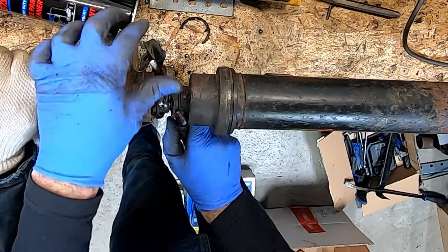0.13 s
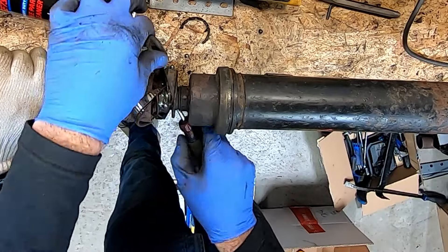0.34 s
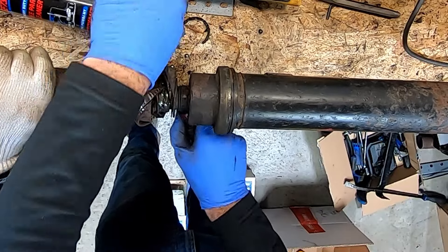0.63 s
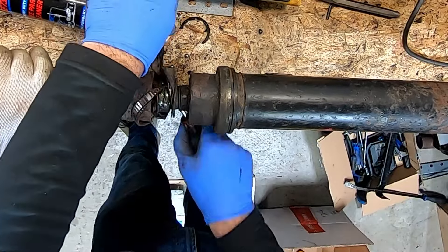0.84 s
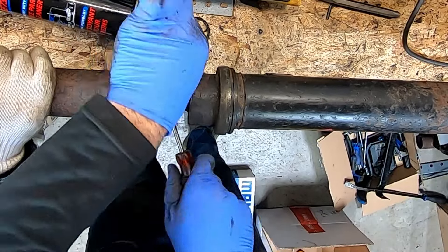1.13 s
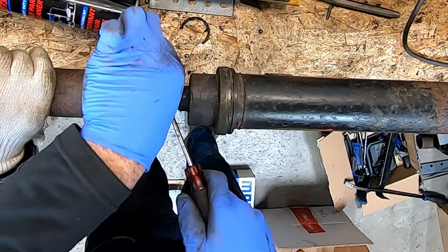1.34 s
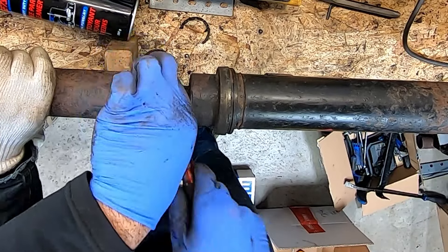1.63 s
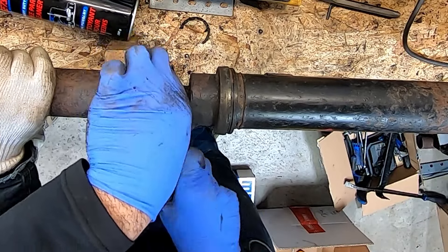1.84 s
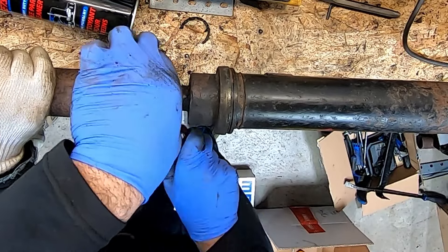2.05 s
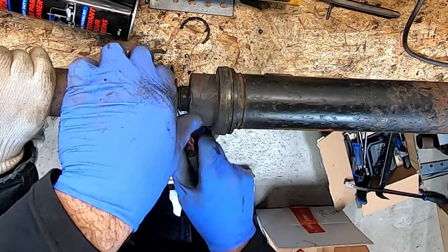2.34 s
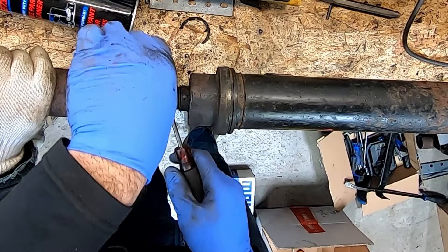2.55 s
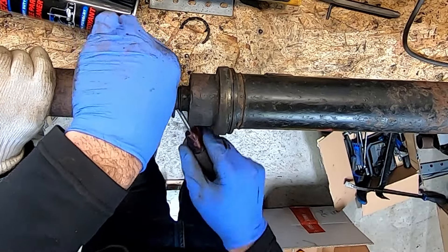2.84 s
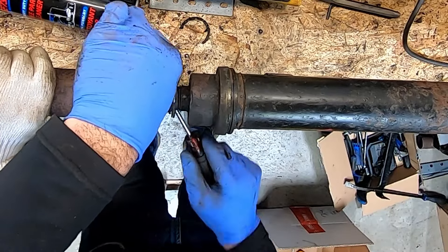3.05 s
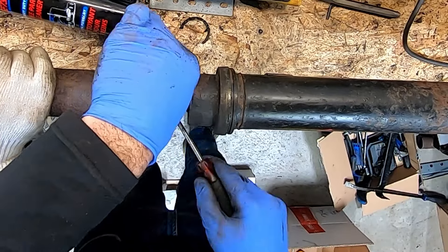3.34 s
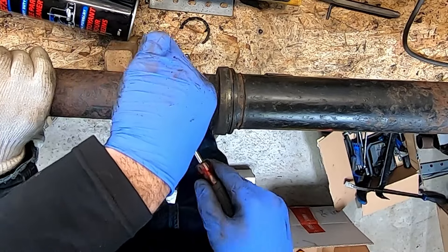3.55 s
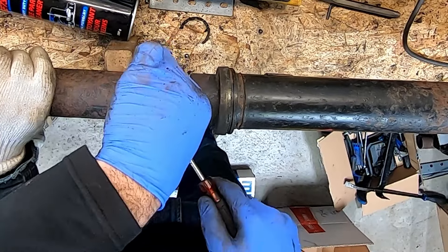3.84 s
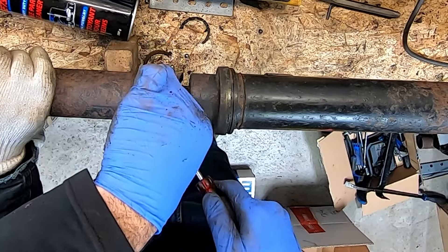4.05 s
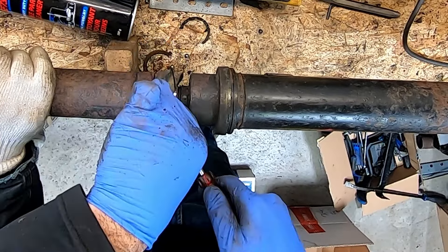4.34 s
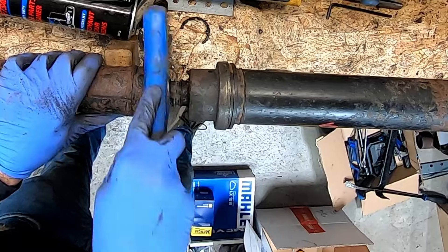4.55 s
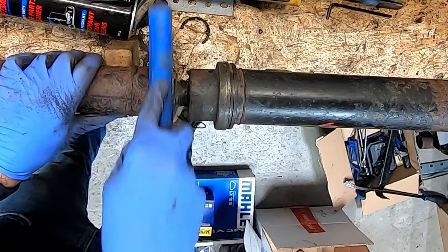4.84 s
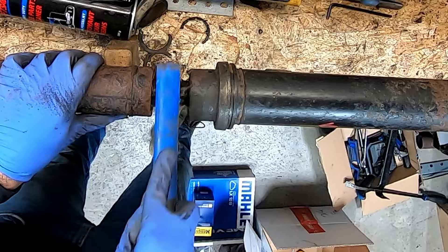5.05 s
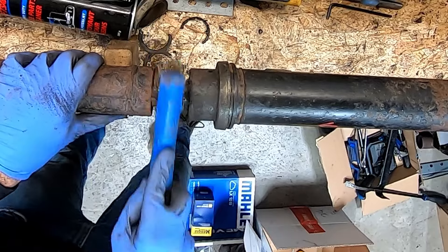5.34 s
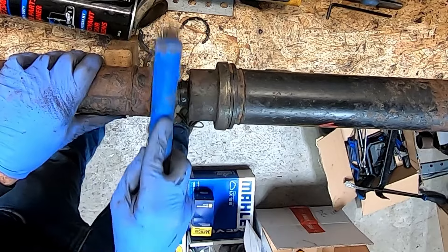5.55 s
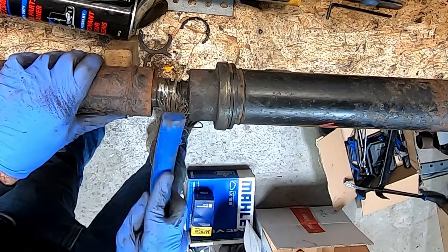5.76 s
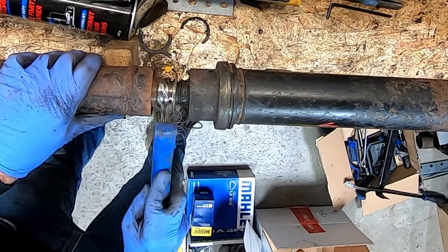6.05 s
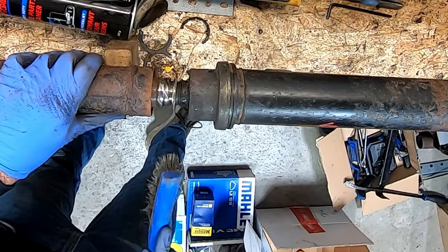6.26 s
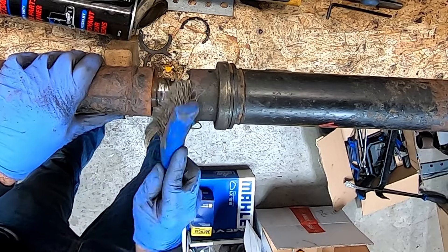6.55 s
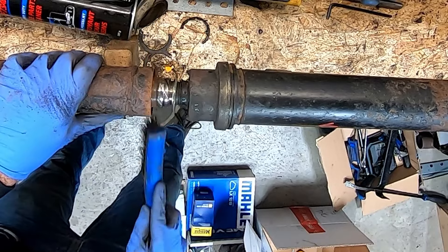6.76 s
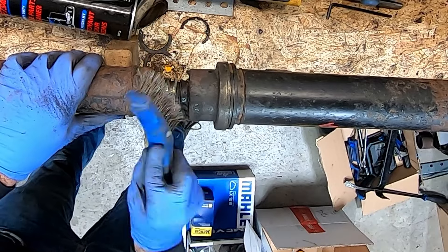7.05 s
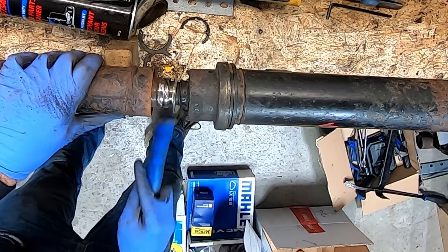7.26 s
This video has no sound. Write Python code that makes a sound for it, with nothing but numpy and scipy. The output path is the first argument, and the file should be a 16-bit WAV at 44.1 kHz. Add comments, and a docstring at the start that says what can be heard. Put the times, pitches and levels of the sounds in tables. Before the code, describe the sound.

Soft scrapes, glove rustles and scattered metal clicks come from a rusty steel shaft being handled on a bench while a pick works at its clamp. Then a wire brush scrubs the shaft in a louder run of fast, hissing strokes, ending in a sharp clank. Two separate strokes and several more knocks follow. The walls of a small workshop add a short reverberation over faint room noise.

```python
"""A small workshop: gloved hands work a pick and a clamp on a rusty steel shaft lying on a bench.
The shaft grinds on its rests, gloves and rust rustle, steel knocks and ticks, the flicked clamp rings
and a fingertip squeaks on the collar. Then a wire brush scrubs the shaft: bristle tips snap over the
rust as dense clicks that ring the steel, the bench shakes and the brush back knocks on the shaft.
The walls reflect it all over quiet room noise; the two channels are nearly alike."""
import sys
import numpy as np
from scipy import signal
from scipy.fft import rfft, irfft
from scipy.io import wavfile
from scipy.ndimage import uniform_filter1d

SR = 44100
rng = np.random.default_rng(int(sys.argv[2]) if len(sys.argv) > 2 else 0)


def master(y):
    """Save y as 16-bit WAV."""
    cut = np.clip(np.atleast_2d(y).T, -1, 1)
    pcm = np.round(cut * 32767)  # scale
    wavfile.write(sys.argv[1], SR, pcm.astype(np.int16))


N = 326781
T = np.arange(N) / SR


def undb(db):
    """Decibels to gain."""
    return 10 ** (np.asarray(db) / 20)


def unit_rms(x):
    """Scale to rms 1."""
    return x / np.sqrt(np.mean(x ** 2))


def unit_peak(x):
    """Scale to peak 1."""
    return x / np.abs(x).max()


def ramp(x):
    """Smooth step over x = 0..1."""
    return np.sin(np.pi / 2 * np.clip(x, 0, 1)) ** 2


def colour(x, points, size=4096):
    """Minimum-phase filter through (freq_hz, gain_db) points; white noise keeps its rms."""
    hz, db = np.transpose(points)
    curve_db = np.interp(np.log(np.arange(size // 2 + 1) * SR / size + 1), np.log(hz), db)
    cepstrum = irfft(curve_db * np.log(10) / 20)
    cepstrum[1:size // 2] *= 2
    cepstrum[size // 2 + 1:] = 0
    impulse = unit_rms(irfft(np.exp(rfft(cepstrum)))) / np.sqrt(size)
    return signal.oaconvolve(x, impulse)[:len(x)]


def bandpass(x, hz, width_hz):
    """One resonance, unity gain at its peak."""
    return signal.lfilter(*signal.iirpeak(min(hz, 16000), hz / width_hz, SR), x)


def resonate(x, modes):
    """Sum of (freq_hz, width_hz, gain_db) resonances, neighbours in opposite phase."""
    return sum((-1) ** k * undb(db) * bandpass(x, hz, width) for k, (hz, width, db) in enumerate(modes))


def walk(rate_hz):
    """Slewed random levels, spread near 1."""
    step = int(SR / rate_hz)
    return 1.5 * uniform_filter1d(np.repeat(rng.standard_normal(N // step + 1), step), step)[:N]


def clicks(share, spread_db, patchy_db, rate_hz):
    """Random snaps on a share of the samples, a few much harder, in uneven patches."""
    snaps = (rng.random(N) < share) * rng.standard_normal(N)
    return unit_rms(snaps * undb(spread_db * rng.exponential(1, N) + patchy_db * walk(rate_hz)))


def add(out, start_s, x):
    """Mix x into out at start_s."""
    i = int(start_s * SR)
    out[i:i + len(x)] += x[:N - i]


# freq_hz, density_db
ROOM_NOISE_SPECTRUM = [(12, -41.5), (20, 8.5), (63, -3.5), (240, -9), (308, -6), (554, -13), (674, -15.5),
                       (866, -15), (1150, -20.5), (2060, -26), (2430, -29.5), (11000, -32), (15800, -33)]


def room_noise(level_db=-67.5):
    """Quiet, low room noise that wavers a little."""
    return undb(level_db + 2.1 * walk(6.9)) * unit_rms(colour(rng.standard_normal(N), ROOM_NOISE_SPECTRUM))


# freq_hz, width_hz, gain_db
GRIND_MODES = [(434.6, 70, 9), (815, 122, 5.5), (1082, 102, -1.5), (1348, 41, 0.5), (1546, 300, -9.5),
               (1847, 710, -19), (860, 433, -14.5)]


def shaft_grind():
    """The shaft scrapes on its rests; the grip damps each mode in turn."""
    scrape = clicks(0.079, spread_db=2, patchy_db=2.5, rate_hz=40)
    return unit_rms(sum(resonate(scrape * undb(2.47 * walk(12)), [mode]) for mode in GRIND_MODES))


# freq_hz, density_db
RUSTLE_SPECTRUM = [(1180, -8.5), (2000, 7), (2590, -24), (3160, -3), (3960, -10.5), (5790, -4),
                   (9650, -11.5), (11800, -8.5), (15800, -23)]


def rust_rustle(tilt_db_per_oct):
    """Gloves rub rust; flakes of every size ring briefly, so each band comes and goes alone."""
    grit = clicks(0.25, spread_db=2, patchy_db=3, rate_hz=60)
    bands_hz = 2400 * 2 ** np.arange(0, 2.75, .25)
    shares = np.array([undb(3.5 * walk(22) + tilt_db_per_oct * np.log2(hz / 6000)) for hz in bands_hz])
    shares /= np.sqrt(np.mean(shares ** 2, axis=0))
    flakes = sum(bandpass(grit * share, hz, hz / 7) for hz, share in zip(bands_hz, shares))
    return unit_rms(colour(flakes, RUSTLE_SPECTRUM))


# freq_hz, gain_db, t60_s
CLAMP_MODES = [(3310, -12, 0.062), (4226, -5, 0.096), (5350, -11, 0.13), (5970, -12, 0.076),
               (6476, -9, 0.076), (7750, -17, 0.06), (8700, -13, 0.11), (9660, -15, 0.1), (10000, -21, .1),
               (10860, -12.5, 0.051), (12400, -14, .09)]


def clamp_chinks():
    """The pick brushes the clamp; sparse touches ring its modes."""
    touches = clicks(.002, spread_db=2, patchy_db=3, rate_hz=25)
    out = np.zeros(N)
    for hz, db, t60_s in CLAMP_MODES:
        width_hz = 6 / t60_s
        drive = touches * undb(4.5 * walk(25) - 10 * np.log10(width_hz))
        out += undb(db) * bandpass(drive, hz, width_hz)
    return unit_rms(out)


# freq_hz, width_hz, gain_db
BENCH_MODES = [(107.8, 27.7, -1.5), (54, 37, -7.5)]


def bench_shake():
    """The bench top rumbles under uneven pushes."""
    return unit_rms(resonate(clicks(0.012, spread_db=3, patchy_db=0, rate_hz=31), BENCH_MODES))


# start_s, rise_s, hold_s, grind_db, rustle_db, rustle_tilt_db_per_oct, shake_db
HAND_MOVES = [(0.0, 0.0024, 0.12, -70.5, -68, 0.5, -77), (0.19, 0.0094, .02, -57, -65, -17, -80),
              (0.25, .02, 0.14, -65.5, -72.5, -1, -79), (0.43, 0.029, 0.029, -74, -67, 5, -71.5),
              (0.544, 0.011, 0.029, -60.5, -74, 5, -64), (0.636, 0.024, 0.085, -78, -79, 2, -74),
              (0.786, 0.0088, 0.069, -68, -67, 19, -77), (0.885, 0.1, 0.028, -51, -58.5, -1.5, -63),
              (1.052, 0.018, 0.1, -59.5, -69.5, -1, -73), (1.226, 0.059, .17, -58.5, -69, 3.5, -68.5),
              (1.486, 0.033, 0.091, -66.5, -77, 11, -67), (1.626, 0.0059, 0.19, -48, -71, 15, -55.5),
              (1.85, .02, 0.065, -61, -71, -2, -61), (2.044, 0.018, 0.019, -60.5, -77, 6, -66),
              (2.095, 0.046, 0.015, -59.5, -67, -19, -56), (2.267, .03, 0.055, -63, -73, -5, -66),
              (2.38, 0.023, 0.066, -67, -71, -2, -70.5), (2.494, 0.018, 0.032, -62, -66.5, 2, -69),
              (2.604, 0.095, 0.063, -54.5, -68, 9, -60), (2.837, 0.011, 0.018, -56, -62.5, -5, -57.5),
              (2.916, .02, 0.036, -60, -68, -2, -68), (3.041, 0.019, 0.033, -60.5, -68.5, 3, -66),
              (3.165, .005, 0.14, -63, -85, -9, -72), (3.305, 0.014, 0.091, -55.5, -66.5, 6, -59),
              (3.44, .02, 0.054, -83, -95, 0, -66), (3.608, 0.023, 0.024, -58, -54.5, -5.5, -62.5),
              (3.816, 0.0085, 0.016, -68.5, -81, -3, -67.5), (3.892, 0.026, 0.1, -67.5, -87, 3, -71),
              (4.053, 0.032, 0.099, -66, -75.5, 1, -78), (4.223, 0.032, 0.055, -71.5, -81, 0, -67),
              (4.43, 0.01, 0.014, -56.5, -66, -6, -56), (7.323, .01, 0.055, -59.5, -64.5, -8, -68)]


def hands(release_t60_s=0.19, chink_re_rustle_db=-11):
    """Each move turns the shaft, rustles the rust, brushes the clamp and shakes the bench."""
    start_s, rise_s, hold_s, grind_db, rustle_db, tilts, shake_db = np.transpose(HAND_MOVES)[:, :, None]
    released_s = np.clip(T - start_s - rise_s - hold_s, 0, None)
    effort = ramp((T - start_s) / rise_s) * undb(-60 * released_s / release_t60_s)
    grind_gain, rustle_gain, shake_gain = (np.linalg.norm(effort * undb(db), axis=0)
                                           for db in (grind_db, rustle_db, shake_db))
    loudest_move = np.argmax(effort * undb(rustle_db), axis=0)
    grind = shaft_grind()
    rustle = rust_rustle(tilts[loudest_move, 0]) + undb(chink_re_rustle_db) * clamp_chinks()
    return grind_gain * grind + rustle_gain * rustle + shake_gain * bench_shake()


# freq_hz, width_hz, gain_db
GRIPPED_SHAFT_MODES = [(215, 100, -13), (476, 44, -4.5), (587, 58, -5.5), (708, 45, 2.5), (838, 130, -10),
                       (992, 48, -6), (1230, 65, -5), (1690, 1170, -15), (2160, 180, -10)]
# freq_hz, width_hz, gain_db
FREE_SHAFT_MODES = [(2140, 22, -2), (2885, 14, 0), (2990, 18, 5), (3620, 9, -12), (3561, 11, -3.5),
                    (3870, 9, -6), (4060, 12, -6.5), (4670, 11, -15), (4850, 40, -8), (5910, 26, -5),
                    (6510, 53, -1.5), (6100, 15, -11)]
# start_s, thock_peak_db, brightness_db, thud_re_thock_db, ring_re_thock_db
SHAFT_KNOCKS = [(0.111, -53, -6, -13, -11), (0.182, -34, -12.5, -38, -22), (0.198, -36, 9, -37, -36),
                (0.357, -48, -4.5, -24, -27), (0.554, -51, -34, -25, -20), (0.574, -54, -25, -10, -24),
                (0.796, -51.5, -10, -24, -25), (0.913, -44, -6, -14, -22), (1.331, -44.5, 13, -32, -20),
                (1.401, -44.5, -17, -28, -28), (1.626, -27.5, 9, -33, -25), (1.676, -34.5, -6.5, -19, -25),
                (1.732, -34, -24, -20, -24), (1.793, -38, -25, -22, -35), (2.835, -44, -8.5, -20, -23),
                (2.949, -49, 1, -18, -8), (3.169, -33, -5.5, -35, -33), (4.44, -45, 11, -5, -25),
                (6.166, -12.5, -13, -23, -10), (6.557, -26.5, -6.5, -1, -13.5), (6.606, -42, -0.5, 4, -12),
                (6.647, -35.5, -3.5, -9, -20), (6.717, -35.5, -25, -8, -20), (6.774, -27, -10, -34, -20),
                (7.095, -29, 1, -12, -16), (7.122, -40, -13, -8, -21)]


def shaft_knocks(rattle_s=0.0041, contact_band_hz=(330, 2600)):
    """A blow and its rattle thock in the held shaft, ring its upper modes and thud in the bench."""
    out, t = np.zeros(N), T[:SR // 3]
    contact = signal.butter(2, contact_band_hz, "bandpass", fs=SR)
    for start_s, peak_db, bright_db, thud_db, ring_db in SHAFT_KNOCKS:
        blow = 0.1 * rng.standard_normal(len(t)) * np.exp(-t / rattle_s)
        blow[0] = 1
        modes = [(hz, width, db + (hz > 950) * (bright_db + 9.5)) for hz, width, db in GRIPPED_SHAFT_MODES]
        thock = unit_peak(resonate(signal.lfilter(*contact, blow), modes))
        ring = unit_peak(resonate(blow, FREE_SHAFT_MODES))
        thud = unit_peak(resonate(1. * (t < .003), BENCH_MODES))
        add(out, start_s, undb(peak_db) * (thock + undb(ring_db) * ring + undb(thud_db) * thud))
    return out


# start_s, peak_db, centre_hz, t60_s
STEEL_TICKS = [(0.18, -40, 3300, .04), (0.2828, -40, 7500, .03), (0.413, -60, 5070, .035),
               (0.801, -45, 4930, .025), (0.954, -49, 3260, .05), (1.094, -46.5, 4820, .044),
               (1.3324, -47, 5740, .035), (1.6275, -30.5, 4440, .042), (1.696, -45, 4680, .04),
               (1.8465, -55, 5000, .035), (1.886, -55, 5000, .03), (2.0614, -54, 6200, .056),
               (2.154, -39, 7400, .024), (2.337, -61, 3210, .035), (2.5082, -48, 5320, .03),
               (2.5349, -43, 4100, .025), (2.626, -54, 8090, .05), (2.6618, -55, 5540, .03),
               (2.75, -51, 6480, .04), (2.834, -50.5, 3330, .053), (2.8844, -51, 6480, .035),
               (3.071, -50.5, 3200, .045), (3.1398, -58, 9000, .03), (3.1682, -47, 2640, .035),
               (3.3109, -54, 5610, .04), (3.367, -49, 5400, .035), (3.3827, -49, 11500, .05),
               (3.418, -48, 11500, .06), (3.6207, -53, 5680, .03), (3.8245, -58, 7800, .035),
               (4.44, -43.5, 6750, .04), (4.5104, -42, 6700, .035), (4.8467, -40, 4860, .03),
               (5.1013, -34, 8930, .035), (6.1703, -17, 3300, .06), (6.557, -24, 4980, .03),
               (6.6073, -29.5, 5030, .03), (6.6746, -31, 7000, .04), (6.7709, -31, 4200, .1),
               (7.097, -25, 8900, .07), (7.1215, -44, 5000, .04), (7.2724, -32, 9300, .05)]


def steel_ticks(width_ratio=.75, crack_db=-18):
    """Steel taps steel: a short band of noise over a fainter wide crack."""
    out, t = np.zeros(N), T[:SR // 10]
    for start_s, peak_db, hz, t60_s in STEEL_TICKS:
        burst = rng.standard_normal(len(t)) * undb(-60 * t / t60_s)
        width_hz = width_ratio * hz
        centre = unit_peak(bandpass(bandpass(burst, hz, width_hz), hz, width_hz))
        crack = unit_peak(bandpass(burst, 9000, width_hz=10000))
        add(out, start_s, undb(peak_db) * (centre + undb(crack_db) * crack))
    return out


# start_s, level_db
CLAMP_FLICKS = [(1.331, -79), (1.402, -67), (1.445, -69), (2.508, -44.5), (2.535, -78), (2.836, -56)]


def clamp_flicks():
    """The thin steel clamp rings freely; each flick weights its modes anew."""
    out, t = np.zeros(N), T[:SR // 4]
    for start_s, level_db in CLAMP_FLICKS:
        weights = undb(level_db + 2 * rng.standard_normal(len(CLAMP_MODES)))
        ring = sum(weight * undb(db - 60 * t / t60_s) * np.sin(2 * np.pi * hz * t)
                   for weight, (hz, db, t60_s) in zip(weights, CLAMP_MODES))
        add(out, start_s, ring)
    return out


# freq_hz, width_hz, gain_db
COLLAR_MODES = [(10180, 180, 17), (13970, 93, 18)]
# start_s, length_s, drive_db
FINGER_SQUEAKS = [(3.894, 0.1, -75), (4.23, 0.082, -82)]


def finger_squeaks():
    """Soft swells of fingertip friction sound the collar's modes."""
    swell = sum(undb(db) * np.sin(np.pi * np.clip((T - start_s) / length_s, 0, 1)) ** 2
                for start_s, length_s, db in FINGER_SQUEAKS)
    return resonate(swell * rng.standard_normal(N), COLLAR_MODES + [(8980, 170, 18)])


# freq_hz, density_db
BRISTLE_SPECTRUM = [(1180, -32.5), (2000, -5), (2680, -24.5), (3110, -6.5), (4210, -2.5), (5220, 2),
                    (6000, -2), (9570, 1.5), (10200, -3), (11800, -10.5), (13100, -7), (14200, -14.5),
                    (15800, -2)]
# freq_hz, density_db
SHAFT_HUM_SPECTRUM = [(110, -49.5), (180, -8), (492, -4), (586, -9.5), (871, 4.5), (1050, -7.5), (1160, -2),
                      (1860, -4.5), (2660, -10.5), (3500, -8), (4550, -32), (7700, -120)]
# freq_hz, width_hz, gain_db
BRUSHED_STEEL_MODES = [(1830, 260, -4), (3180, 100, -13.5), (5260, 510, -6.5), (8750, 110, -19)]
# start_s, length_s, level_db, lower_collar_re_level_db, upper_collar_re_level_db
BRUSH_STROKES = [(4.507, .17, -40, -27, -19), (4.683, 0.14, -39, -24, -21), (4.827, 0.17, -38, -22, -19),
                 (5.011, .16, -40.5, -8, -10), (5.182, 0.17, -39.5, -15, -16),
                 (5.354, 0.16, -40.5, -16, -14), (5.504, 0.18, -41, -10, -10),
                 (5.689, 0.17, -39, -9.5, -12.5), (5.844, 0.16, -40, -5, -6.5), (6.014, 0.17, -38, -9, -8),
                 (6.578, 0.21, -41, -9, -7), (7.133, 0.19, -42, -18, -19)]


def wire_brush(speed_up_s=0.047, slow_down_s=0.054, turn_speed=.36, turn_s=0.037):
    """Bristle snaps hiss, ring the steel, hum in the shaft and shake the bench, following brush speed."""
    hiss_db, hum_db, shake_db = -2, -9, -8
    hiss_power, hum_power, shake_power = 1.64, 0.93, 1.3
    collar_rise_db, collar_flicker_db, shake_lag_s = 12.5, 3.5, 0.014
    start_s, length_s, level_db, *collar_db = np.transpose(BRUSH_STROKES)[:, :, None]
    elapsed_s, left_s = T - start_s, start_s + length_s - T
    sweep = ramp(elapsed_s / speed_up_s) * ramp(left_s / slow_down_s)
    turn = turn_speed * ramp(elapsed_s / .008) * ramp(left_s / turn_s + 1)
    speed = np.maximum(sweep, turn)  # bristles still drag as the brush turns round
    snap_gains, hum_gains, shake_gains = (undb(level_db) * speed ** power
                                          for power in (hiss_power, hum_power, shake_power))

    bristles = clicks(.3, spread_db=1.95, patchy_db=2, rate_hz=90)
    drag = hum_gains.sum(axis=0) * clicks(.2, spread_db=1.2, patchy_db=1.3, rate_hz=46)
    hum = colour(drag, SHAFT_HUM_SPECTRUM)
    snaps = snap_gains.sum(axis=0) * bristles
    hiss = colour(snaps, BRISTLE_SPECTRUM)
    hiss += sum(resonate(snaps * undb(4.6 * walk(16)), [mode]) for mode in BRUSHED_STEEL_MODES)

    # the collar rings more as a stroke goes on
    catching = snap_gains * undb(collar_rise_db * np.clip(elapsed_s / length_s - .5, -1, 1))
    collar = np.zeros(N)
    for db, mode in zip(collar_db, COLLAR_MODES):
        drive = bristles * np.sum(catching * undb(db), axis=0)
        collar += resonate(drive * undb(collar_flicker_db * walk(30)), [mode])

    push = np.interp(T - shake_lag_s, T, shake_gains.sum(axis=0)) * undb(2.5 * walk(12))
    return undb(hiss_db) * hiss + undb(hum_db) * hum + collar + undb(shake_db) * push * bench_shake()


# freq_hz, t60_s
WORKSHOP_DECAY = [(100, 0.51), (500, 0.25), (2000, 0.48), (5000, 0.44), (10000, 0.3), (13000, 0.15),
                  (16000, 0.13)]


def workshop_reverb(x, tilt_db_per_oct=-1, build_up_s=0.0017):
    """Dense reflections in half-octave bands, each dying at its own rate; walls return less treble."""
    t = T[:SR // 2]
    tail = np.zeros(len(t))
    for hz in 90 * 2 ** np.arange(0, 8, .5):
        band = bandpass(bandpass(rng.standard_normal(len(t)), hz, hz / 1.8), hz, hz / 1.8)
        t60_s = np.interp(hz, *np.transpose(WORKSHOP_DECAY))
        tail += band * undb(tilt_db_per_oct * np.log2(hz / 1000) - 60 * t / t60_s)
    tail *= 1 - np.exp(-t / build_up_s)
    return signal.fftconvolve(x, tail / np.linalg.norm(tail))[:N]


# freq_hz, relative_db
STEREO_SIDE_SPECTRUM = [(60, -34.5), (110, -28.5), (200, -16), (380, -15), (700, -24.5), (1290, -34),
                        (2380, -28), (4400, -21), (8120, -14.5), (15000, -7)]


def scene(reverb_db=-11, side_db=-24.5):
    """All sources in the room, with a faint phase-scattered side signal."""
    direct = wire_brush() + hands() + finger_squeaks() + steel_ticks() + clamp_flicks() + shaft_knocks()
    mid = direct + undb(reverb_db) * workshop_reverb(direct) + room_noise()
    phase_scatter = irfft(np.exp(2j * np.pi * rng.random(513)))
    side = undb(side_db) * colour(signal.oaconvolve(mid, phase_scatter)[:N], STEREO_SIDE_SPECTRUM)
    return np.array([mid + side, mid - side])


def record(dry):
    """Steep low-pass at 15.7 kHz."""
    return signal.sosfilt(signal.ellip(12, .2, 70, 15700, fs=SR, output="sos"), dry)


dry = scene()
out = record(dry)
master(out)
```